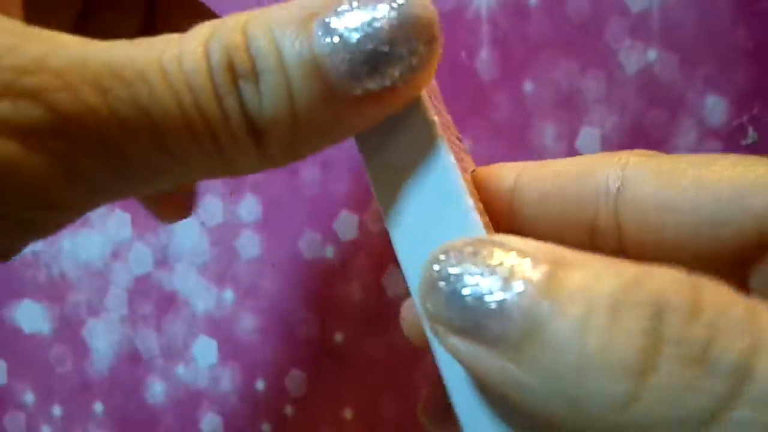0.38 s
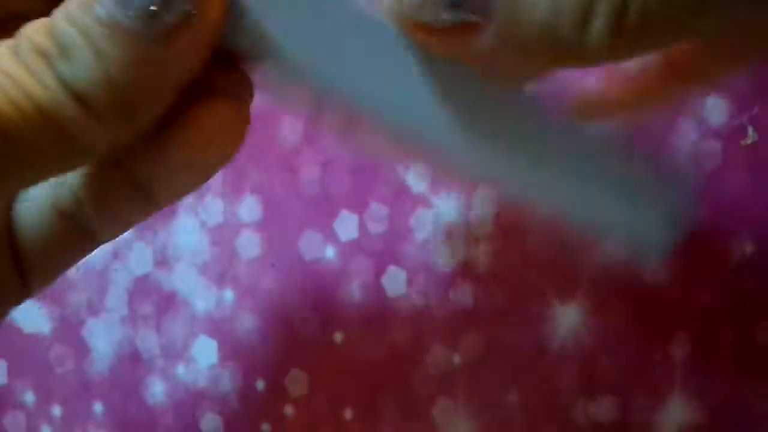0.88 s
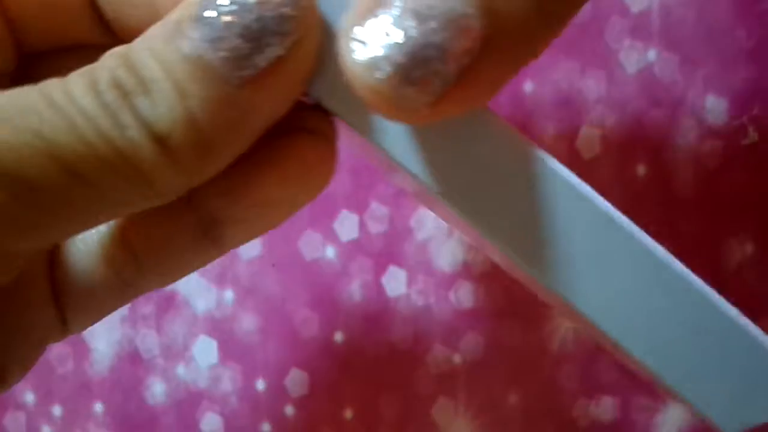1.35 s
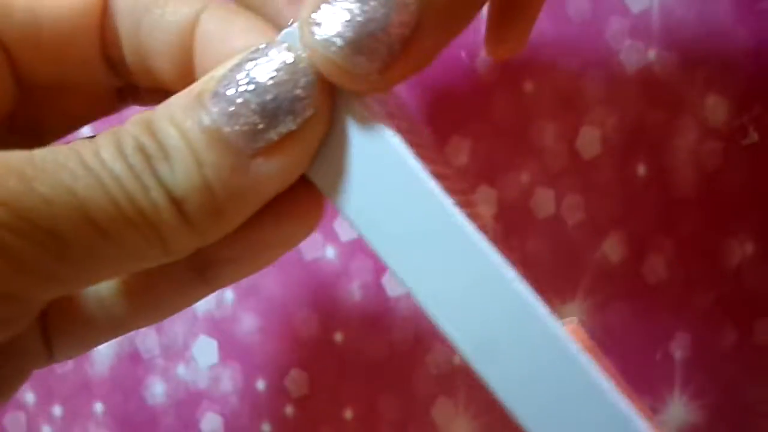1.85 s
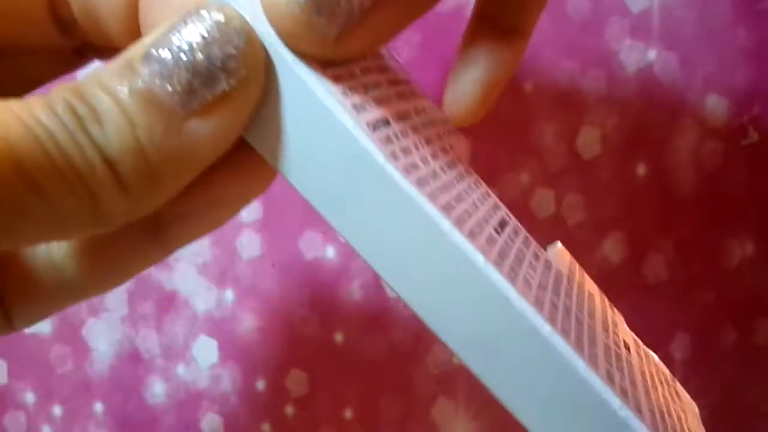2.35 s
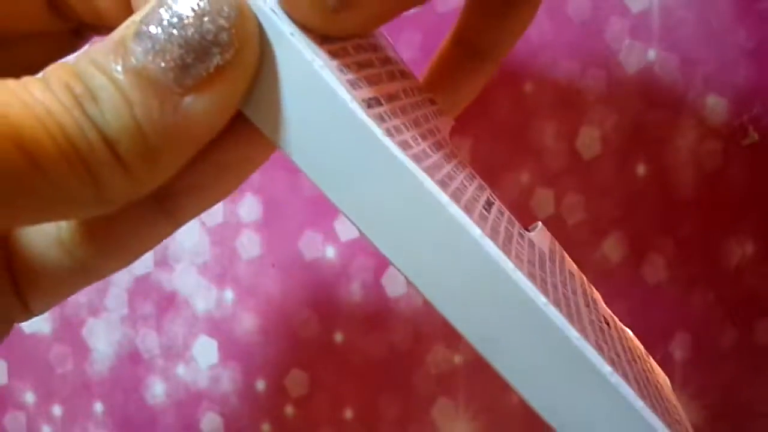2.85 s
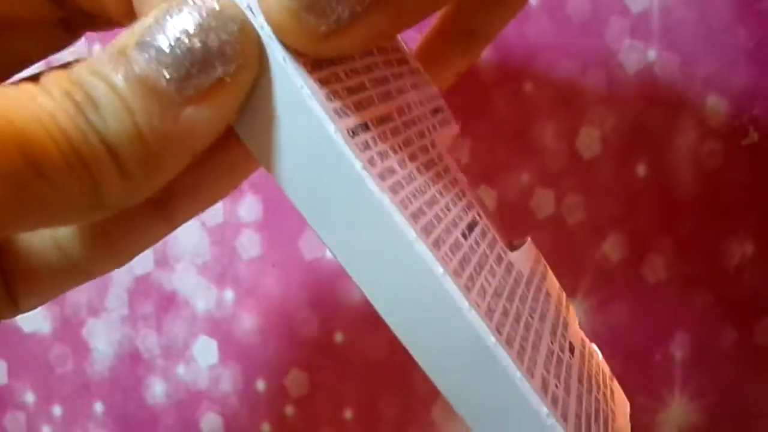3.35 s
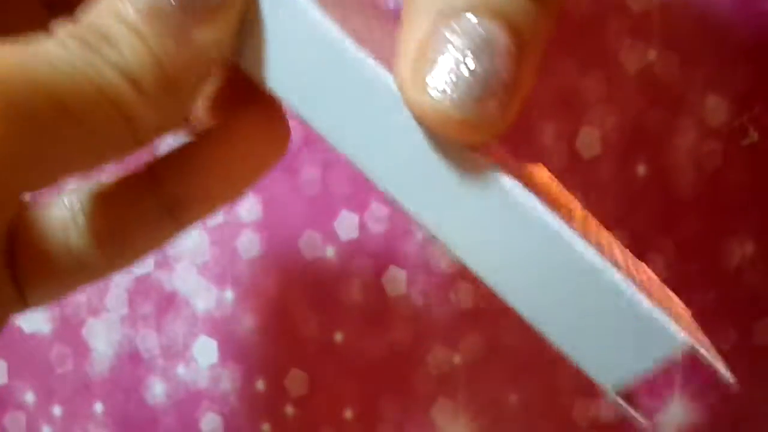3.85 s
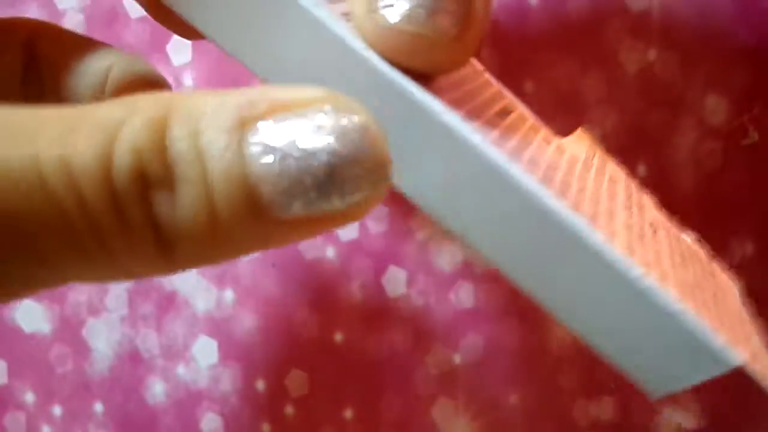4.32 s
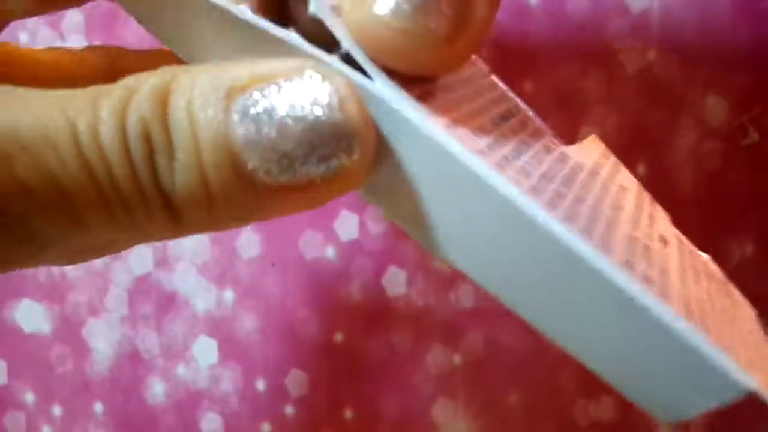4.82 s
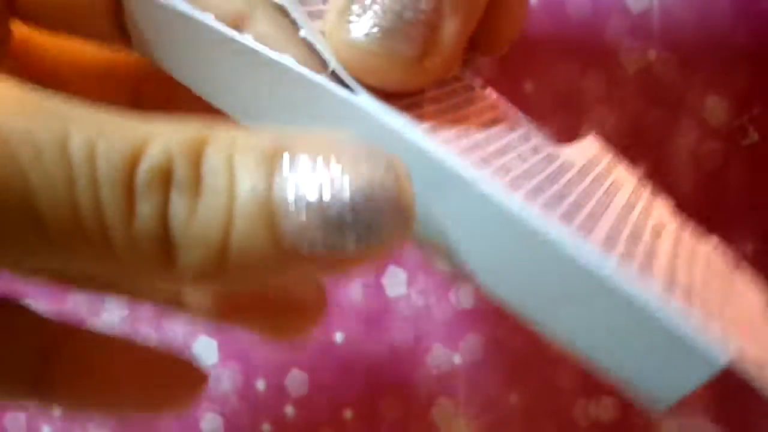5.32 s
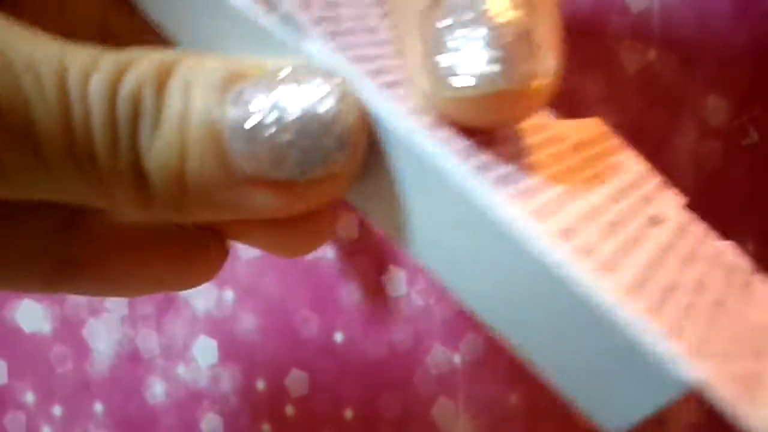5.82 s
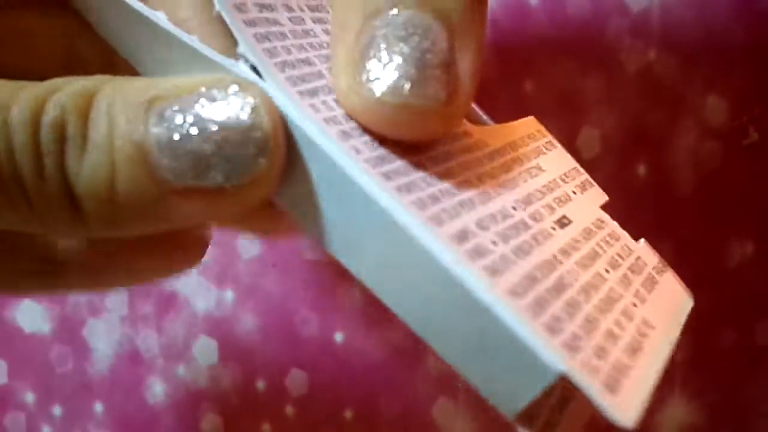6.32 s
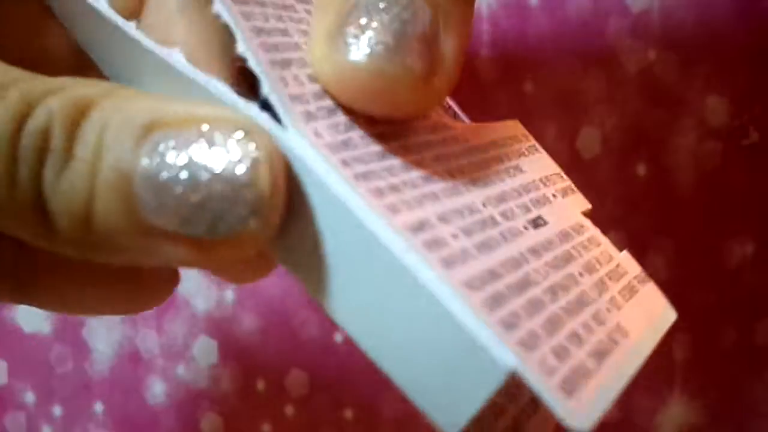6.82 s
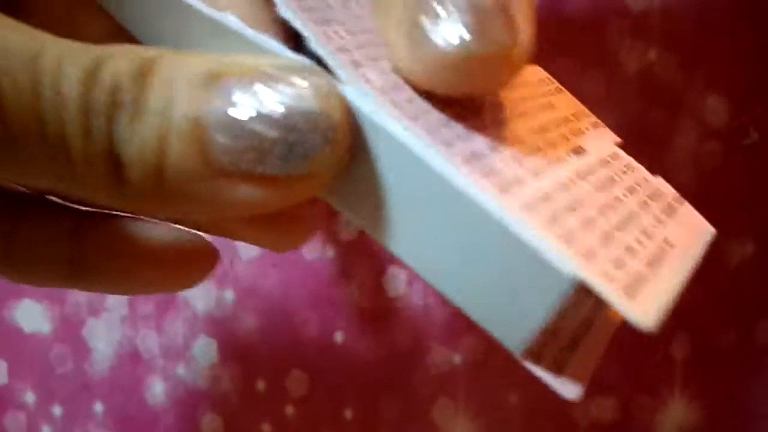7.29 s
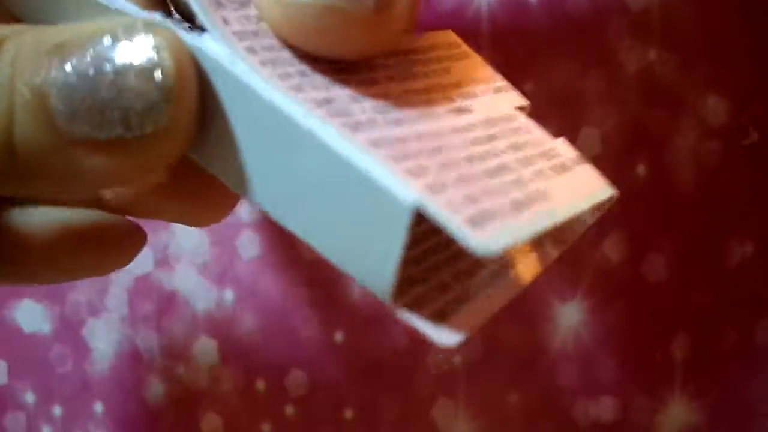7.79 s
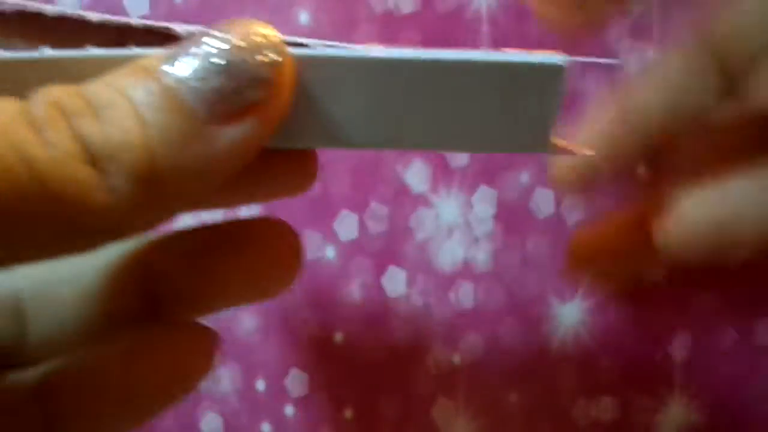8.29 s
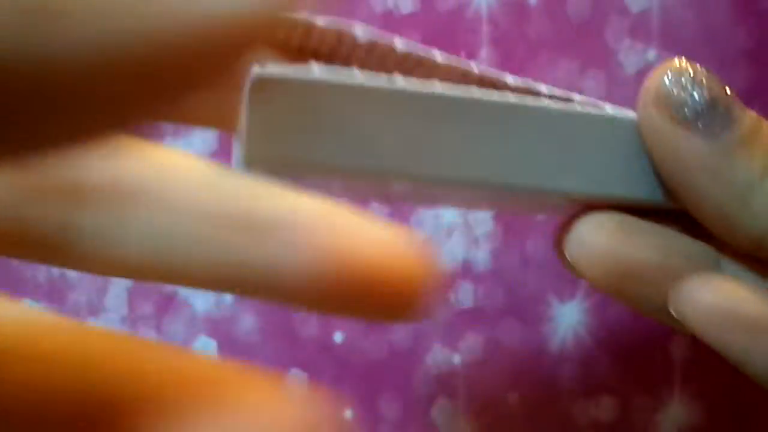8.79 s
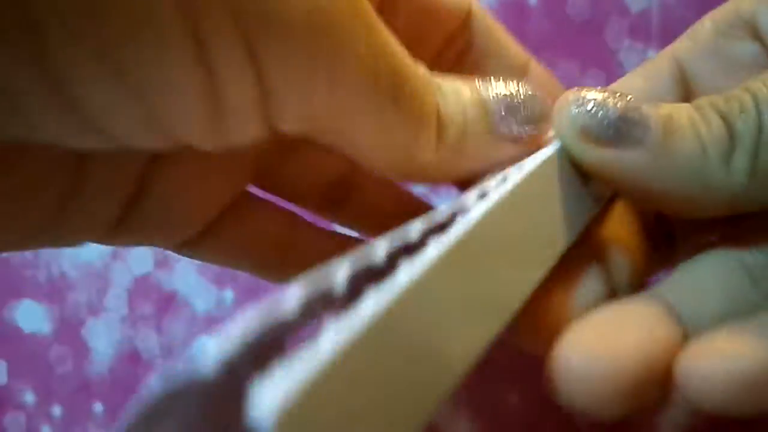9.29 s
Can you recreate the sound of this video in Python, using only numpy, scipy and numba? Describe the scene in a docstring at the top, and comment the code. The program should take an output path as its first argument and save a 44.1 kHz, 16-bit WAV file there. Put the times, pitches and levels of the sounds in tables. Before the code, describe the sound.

Fingers rub and pry open a small thin card box up close, with dry scratches, sharp cardboard snaps and crackling peeling glue in a quiet room.

```python
"""Fingers prise open a small paperboard carton close to a phone, in a quiet room.
Steady hiss, a wavering low hum and the faint rub of the holding hand (filtered noise) come first.
Then skin rubs the card in grainy noise bursts, and glue spots and creases let go in snaps: ragged
slips that excite the hollow and the walls, with a short diffuse room tail. From 3.3 s the seam also
peels in random ticks, and from 4 s fingertips bump the body, each push exciting one damped mode."""
import sys
import numpy as np
from scipy import signal
from scipy.fft import rfft, irfft, next_fast_len
from scipy.io import wavfile
from scipy.ndimage import uniform_filter1d
from numba import njit

SR = 44100
rng = np.random.default_rng(int(sys.argv[2]) if len(sys.argv) > 2 else 0)


def transcribe(u):
    """Save the signal u as a 16-bit wav file named by the first command-line argument.

    u: samples, shape (n,) or (channels, n), limited to [-1, 1]; the rate is SR.
    q: integer samples, one column per channel.
    """
    v = np.clip(np.atleast_2d(u).T, -1, 1)
    q = np.round(v * 32767).astype(np.int16)
    wavfile.write(sys.argv[1], SR, q)


def boost_factor(decibels):
    """Convert a level in decibels to a linear amplitude factor."""
    exponent = np.asarray(decibels, float) / 20
    return 10 ** exponent


N = 425565  # samples, 9.65 s


def level(x, db):
    """Level setting: scale to an rms level."""
    return x * boost_factor(db) / np.sqrt(np.mean(x ** 2))


def peak(x, db):
    """Level setting: scale to a peak level."""
    return x * boost_factor(db) / np.abs(x).max()


def curve(table):
    """Linear interpolation: the columns after the time column, one value a sample."""
    time_s, *columns = np.transpose(table)
    return [np.interp(np.arange(N) / SR, time_s, column) for column in columns]


def steps(rate_hz):
    """Random modulation: normal levels (spread 1 before smoothing) held 1 / rate_hz s, quick changes."""
    hold = int(SR / rate_hz)
    held = np.repeat(rng.standard_normal(N // hold + 1), hold)
    return uniform_filter1d(held, max(hold // 4, 1))[:N]


@njit
def svf(x, hz, width):
    """Second-order resonance: state-variable band-pass, movable centre, gain 1 at the centre."""
    y, b, l = np.empty(len(x)), 0., 0.
    for i in range(len(x)):
        g, k = np.tan(np.pi * hz[i] / SR), width / hz[i]
        v = (b + g * (x[i] - l)) / (1 + g * (g + k))
        b, l, y[i] = 2 * v - b, l + 2 * g * v, k * v
    return y


def band(x, hz, width_hz):
    """Simple resonance: one mode at a fixed or moving frequency."""
    centre_hz = np.clip(hz * np.ones(len(x)), 20., .45 * SR)
    return svf(x + 1e-18, centre_hz, float(width_hz))


def steep(x, hz, width_hz):
    """Cascaded resonance: two equal band-passes in series give steep skirts."""
    return band(band(x, hz, width_hz), hz, width_hz)


# Spectrum of the hiss, relative: frequency [Hz], density [dB per Hz]
HISS_SPECTRUM = [(15, -26), (25, 12.5), (71, -2.5), (464, -2), (868, -8.5), (1860, -11), (2520, -14),
                 (4980, -17.5), (14400, -17), (15700, -17), (17000, -37)]
# Swell of the hum: start_s [s], level_db [dB rms]
HUM_SWELL = [(0.0, -59), (0.16, -45.5), (0.56, -59.5), (1.4, -61.5), (1.8, -52.5), (2.74, -60),
             (3.98, -56.5), (4.89, -65), (5.75, -56.5), (6.07, -53.5), (6.4, -73), (7.69, -63), (8.3, -56),
             (9.65, -62)]
HISS_DB = -56
HUM_HZ, HUM_WIDTH_HZ = 58.3, 21


def background():
    """Stationary and narrow-band noise: steady coloured hiss, and a low hum that swells and wavers."""
    n = next_fast_len(N)
    hz, db = np.transpose(HISS_SPECTRUM)
    bin_hz = np.arange(n // 2 + 1) * SR / n
    colour = boost_factor(np.interp(np.log(bin_hz + 1), np.log(hz), db))
    hiss = irfft(rfft(rng.standard_normal(n)) * colour, n)[:N]
    hum = steep(rng.standard_normal(N), HUM_HZ, HUM_WIDTH_HZ)
    second_harmonic = band(rng.standard_normal(N), 2 * HUM_HZ, 25.)
    swelling_hum = boost_factor(curve(HUM_SWELL)[0]) * level(hum, 0)
    return level(hiss, HISS_DB) + swelling_hum + level(second_harmonic, -63.0)


# Modes of the card walls: pitch_hz [Hz], base_width_hz [Hz, before widening], level_db [dB, relative]
CARD_MODES = [(390, 610, -5), (730, 660, -6), (1080, 195, -5.5), (4190, 3900, 15), (6900, 3530, 16),
              (8300, 190, -8), (10000, 2900, 15.5), (11510, 840, 10.5), (14300, 2050, 21)]


def panel(x, low, bend=1):
    """Modal superposition: the walls ring at their low or high modes; bending the card shifts them."""
    ringing = 0
    for hz, width_hz, db in CARD_MODES:
        if (hz < 1500) == low:
            ringing = ringing + boost_factor(db) * steep(x, bend * hz, 1.5 * width_hz)
    return ringing


# Hollow of the box, ringing higher as its flap opens:
# start_s [s], pitch_hz [Hz], hold_db [dB, mean of the faint rub of the holding hand]
HOLLOW = [(0.0, 2880, -64), (0.51, 2490, -57), (1.3, 2420, -59.5), (2.5, 2300, -67), (2.74, 2280, -72.5),
          (3.52, 2210, -59), (3.72, 2390, -66.5), (4.06, 2460, -55), (4.45, 2320, -66.5),
          (5.13, 2350, -57.5), (5.5, 2430, -72), (5.86, 3550, -73), (6.42, 2860, -65.5), (6.93, 3145, -83),
          (7.3, 3630, -91), (8.3, 3030, -64.5), (8.57, 2920, -60), (9.65, 2920, -66)]
# How well the contact reaches the walls; it drops while only the free flap is pulled:
# start_s [s], level_db [dB, relative]
WALL_COUPLING = [(0, -8.5), (1.0, -1), (1.9, 1), (3.0, -1), (3.45, -6.5), (3.97, -2.5), (4.55, -14),
                 (4.87, -1), (5.1, -8.5), (5.45, 0), (6.05, -8), (6.4, -1.5), (6.62, -7), (6.72, -10),
                 (6.78, -20), (6.87, -26), (6.92, -3), (7.14, -1.5), (7.3, -39), (7.66, -9.5), (7.82, -1.5),
                 (8.9, -6.5), (9.65, -1)]
# Skin sliding and fibres tearing, levels at full press before the random grain changes:
# start_s [s], length_s [s], hollow_db [dB, also drives the walls], bright_db [dB]
STROKES = [(0.179, 0.027, -46, -47), (0.261, 0.057, -44.5, -43), (0.305, 0.066, -51.5, -56.5),
           (0.405, 0.11, -45.5, -46.5), (0.492, 0.074, -56.5, -57), (0.556, 0.056, -47, -46),
           (0.747, 0.1, -55, -58), (0.87, 0.037, -39.5, -42), (1.008, 0.072, -53, -48),
           (1.226, 0.049, -57, -59), (1.405, 0.34, -63.5, -55.5), (1.784, 0.076, -55, -57),
           (1.893, 0.048, -60.5, -54), (1.989, 0.048, -57, -47.5), (2.08, 0.14, -61, -57.5),
           (2.305, 0.071, -64, -64), (2.49, 0.066, -59.5, -62), (2.863, 0.026, -46.5, -50.5),
           (2.933, 0.079, -51, -54), (3.207, 0.036, -55, -70), (3.459, 0.046, -47.5, -47),
           (3.527, 0.051, -55, -49.5), (3.562, 0.12, -62, -56.5), (3.779, 0.23, -56, -51.5),
           (3.952, 0.017, -44, -41), (3.958, 0.1, -53.5, -48.5), (4.029, 0.029, -50, -47),
           (4.048, 0.023, -39, -41.5), (4.06, 0.082, -72, -54), (4.216, 0.093, -56, -59.5),
           (4.452, 0.031, -51.5, -46.5), (4.548, 0.083, -64, -44), (4.854, 0.085, -53, -50),
           (5.053, 0.012, -45.5, -66), (5.114, 0.13, -59.5, -58), (5.277, 0.022, -44, -43),
           (5.297, 0.048, -58, -53), (5.404, 0.042, -49.5, -51), (5.44, 0.056, -46.5, -46),
           (5.488, 0.08, -55.5, -46), (5.535, 0.075, -45.5, -40.5), (5.596, 0.04, -67, -58),
           (5.693, 0.045, -46.5, -48), (5.727, 0.077, -50.5, -53), (5.865, 0.065, -55, -57),
           (6.003, 0.092, -52.5, -47), (6.11, 0.071, -71, -58), (6.251, 0.04, -55, -59),
           (6.338, 0.029, -59, -49.5), (6.502, 0.084, -50.5, -46.5), (6.63, 0.12, -75, -51),
           (6.698, 0.042, -57, -33.5), (6.714, 0.052, -56, -47), (6.93, 0.021, -50, -45),
           (7.106, 0.014, -43.5, -69), (7.157, 0.1, -60, -58), (7.43, 0.028, -56, -52),
           (7.46, 0.13, -63, -60), (7.814, 0.051, -64, -49), (7.85, 0.049, -48.5, -38),
           (7.893, 0.11, -43, -39.5), (7.957, 0.028, -39.5, -40), (7.98, 0.035, -36, -36),
           (8.005, 0.05, -52, -46.5), (8.334, 0.019, -54, -57), (8.424, 0.038, -44, -51),
           (8.444, 0.16, -54, -54.5), (8.527, 0.15, -55.5, -49), (8.627, 0.29, -89, -54),
           (8.814, 0.097, -47.5, -46.5), (8.847, 0.019, -36.5, -39), (8.882, 0.005, -45, -55),
           (9.159, 0.082, -56, -50), (9.23, 0.28, -62, -52), (9.419, 0.045, -53, -47),
           (9.462, 0.15, -62.5, -51.5)]


def rub():
    """Stick-slip friction: skin catches on fibres in uneven dense grains, coloured by hollow and walls."""
    ring_hz, hold_db = curve(HOLLOW)
    press = np.zeros((3, N + SR))  # hollow, walls, fibres
    for start_s, length_s, hollow_db, bright_db in STROKES:
        i = int(start_s * SR)
        u = np.linspace(0, 1, max(int(length_s * SR), 2))
        # the finger presses in, slides and lets go
        shape = np.clip(u / 0.23, 0, 1) * np.clip((1 - u) / 0.38, 0, 1) ** 0.64
        gains = boost_factor(np.array([hollow_db, hollow_db, bright_db]))
        press[:, i:i + len(u)] += gains[:, None] * shape
    press = press[:, :N]
    press[1] *= boost_factor(curve(WALL_COUPLING)[0])
    press[0] += boost_factor(hold_db + 3.44 * steps(20.0))

    # exponential sample-by-sample peaks make the grains
    grip = boost_factor(2. * steps(120.) + 1.1 * steps(400.) + 2.6 * rng.exponential(size=N))
    air, wall, fibre = rng.standard_normal((3, N)) * grip
    bend = 1 + 0.087 * steps(25.)
    # two close modes of the hollow over a broader one
    hollow = level(steep(air, 0.961 * ring_hz, 410.0), 0)
    hollow = hollow + level(steep(air, 1.066 * ring_hz, 730.0), -1.9)
    hollow = hollow + level(steep(air, 1.234 * ring_hz, 3700.0), 0.11)
    walls, fibres = panel(wall, True, bend), panel(fibre, False, bend)
    # each part of the box is pressed a little differently from moment to moment
    return sum(p * level(layer, 0) * boost_factor(2.5 * steps(60.))
               for p, layer in zip(press, (hollow, walls, fibres)))


ROOM_DB, ROOM_T60_S, ROOM_RISE_S = -24, 0.13, 0.002


def room(x):
    """Diffuse reverberation: table and near walls return an exponentially decaying noise tail."""
    t = np.arange(SR // 4) / SR
    rise = 1 - np.exp(-t / ROOM_RISE_S)
    tail = rng.standard_normal(len(t)) * rise * np.exp(-t * np.log(1000) / ROOM_T60_S)
    response = boost_factor(ROOM_DB) * tail / np.sqrt(np.sum(tail ** 2))
    return signal.fftconvolve(x, response)[:N]


# Creases and glue spots letting go:
# start_s [s], ring_db [dB peak, hollow], crack_db [dB peak], crack_hz [Hz, centre],
# slip_s [s, time for the slip to fall 60 dB]
SNAPS = [(0.1895, -27.5, -29.5, 7940, 0.0064), (0.632, -27.5, -27.5, 8700, 0.0067),
         (0.8731, -11.5, -15.5, 11300, 0.0039), (0.8766, -7.5, -15, 8300, 0.0092),
         (0.882, -13, -12.5, 7300, 0.0047), (0.9798, -22.5, -45, 6600, 0.0096),
         (0.9887, -17.5, -23, 8000, 0.0101), (2.4195, -36, -28, 14000, 0.0056),
         (2.451, -33, -31, 12000, 0.0074), (2.7231, -50, -37, 14400, 0.004),
         (3.137, -30.5, -47, 8800, 0.0024), (3.2262, -43, -30, 13200, 0.0054),
         (3.3046, -48, -30, 13400, 0.011), (3.327, -37, -27, 13800, 0.0066),
         (3.3582, -44, -30, 13800, 0.006), (3.3719, -33, -12, 14300, 0.0039),
         (3.3762, -2, -20, 9100, 0.012), (3.3879, -17.5, -12, 11800, 0.0039),
         (3.6082, -30.5, -36, 6400, 0.0094), (3.9764, -22.5, -33, 6100, 0.0085),
         (4.1119, -19.5, -37, 6300, 0.014), (4.14, -28, -32, 7200, 0.0092),
         (4.1937, -35.5, -34, 8950, 0.01), (4.5242, -53, -30, 13800, 0.0062), (4.5422, 1.5, 4, 7970, 0.014),
         (4.698, 1, -0.5, 9500, 0.016), (4.8213, -28, -47, 10100, 0.0081), (4.8583, -26, -33, 10900, 0.014),
         (4.8755, -24.5, -37, 10000, 0.0088), (4.998, -31.5, -49, 8500, 0.014),
         (5.0996, -28.5, -60, 8700, 0.0103), (5.1716, -38, -28.5, 7460, 0.0063),
         (5.7078, -22, -24, 10000, 0.019), (5.8103, -36.5, -36, 5740, 0.0039),
         (5.8816, -34, -32, 9100, 0.0044), (5.8988, -37, -38, 8100, 0.0089),
         (5.9173, -32.5, -27.5, 7550, 0.0069), (6.0458, -37, -26, 7700, 0.0081),
         (6.1013, -44, -28.5, 7400, 0.0046), (6.1168, -43, -32, 7600, 0.0054),
         (6.1674, -44, -32, 8100, 0.004), (6.194, -31, -20, 7500, 0.0059), (6.2066, -6, -2, 7240, 0.013),
         (6.2771, -29, -23.5, 7400, 0.0085), (6.384, -25, -25.5, 6650, 0.0104),
         (6.6605, -48, -35, 11300, 0.0074), (6.6828, -44, -23, 11800, 0.0051),
         (6.7157, -15.5, -6, 11900, 0.0026), (6.7193, -6, -7.5, 9370, 0.02),
         (6.7598, -15, -11.5, 10600, 0.021), (6.7615, -7, -7.5, 13000, 0.015),
         (6.8416, -40, -38, 11400, 0.0064), (6.8607, -34.5, -38, 12500, 0.0053),
         (6.8736, -39, -46, 11600, 0.0071), (6.893, -43, -52, 10600, 0.0066),
         (6.914, -47, -56, 7800, 0.0063), (6.9283, -26, -32, 11900, 0.0089),
         (6.9454, -25.5, -36, 10800, 0.0056), (7.0282, -25.5, -31.5, 9900, 0.012),
         (7.1095, -27, -43, 6400, 0.0075), (7.129, -25, -25, 12100, 0.016), (7.1348, -26, -28, 10000, 0.01),
         (7.179, -39, -40, 8800, 0.0063), (7.3746, -50, -36, 13100, 0.0051),
         (7.3992, -40, -42, 8200, 0.004), (7.408, -32, -29, 8300, 0.0069), (7.4263, -26, -17, 10200, 0.012),
         (7.4324, -16, -13.5, 9400, 0.0048), (7.4494, -24, -22, 11200, 0.006),
         (7.4558, -25, -34, 10000, 0.011), (7.5277, -32, -34, 12100, 0.0067),
         (7.6555, -27, -18, 13100, 0.0051), (7.6708, -31, -42, 11900, 0.0081),
         (7.8224, -25, -20.5, 8800, 0.0048), (7.8738, -19.5, -26, 9500, 0.016),
         (7.9536, -8, -19.5, 6900, 0.017), (8.1318, -52.5, -33, 10600, 0.0067),
         (8.854, -25.5, -20, 5760, 0.0056), (9.0368, -30, -36, 5540, 0.0057),
         (9.1133, -35.5, -43, 5600, 0.0039), (9.1583, -32, -42, 5600, 0.0056),
         (9.1857, -32, -32, 5450, 0.007)]
CREEP_DB, CREEP_S = -21.5, .0015  # the glue stretches just before it gives; the creep dies away after
SETTLE_DB, SETTLE_T60_S = -28.5, 0.13  # loose fibres rustle on afterwards
THUD_DB = -6.5  # wall thud relative to the ring, before the wall coupling
SPREAD_DB, SPREAD_PER_DB = 8.5, 2.15  # a tearing snap spreads the ring; a clean pop keeps it narrow


def snaps():
    """Impulsive excitation: a creep, a ragged slip and a settling rustle drive the hollow and walls."""
    lead = SR // 100  # the creep begins 10 ms ahead of the slip
    out = np.zeros(N + SR)
    t = (np.arange(SR // 10) - lead) / SR
    after = np.maximum(t, 0)
    rise = 1 - np.exp(-after / 0.00024)
    creep = boost_factor(CREEP_DB) * np.exp(-np.abs(t) / CREEP_S)
    settle = boost_factor(SETTLE_DB) * np.exp(-after * np.log(1000) / SETTLE_T60_S)
    chance = rng.standard_normal((len(SNAPS), 2, len(t)))
    ring_hz, coupling_db = curve(HOLLOW)[0], curve(WALL_COUPLING)[0]
    for (start_s, ring_db, crack_db, crack_hz, slip_s), (a, b) in zip(SNAPS, chance):
        i = int(start_s * SR)
        fade = np.exp(-after * np.log(1000) / np.clip(slip_s, .0005, .04))
        ragged = a * boost_factor(2.0 * b)
        push = (rise * (fade + settle) + creep) * ragged

        spread_db = SPREAD_DB + SPREAD_PER_DB * np.clip(crack_db - ring_db, -12, 0)
        narrow = peak(band(push, 0.967 * ring_hz[i], 372.0), 0)
        ring = narrow + peak(steep(push, ring_hz[i], 3040.0), spread_db)

        # the fibres part in the first instant, at randomly shifted card modes
        crack = panel((rise * fade ** 2.38 + creep) * ragged, False, 1 + 0.12 * b[0])
        rustle = panel(rise * settle * ragged, False) / np.abs(crack).max()
        # a small crease favours card modes near its own pitch
        favoured = peak(steep(crack, crack_hz, 3070.0), 0)
        crack = favoured + peak(crack, -0.52) + boost_factor(2.0) * rustle

        # the soft walls follow more slowly than the crease itself
        thud = panel(uniform_filter1d(push, size=5), True, 1 + 0.029 * b[-1])
        thud = peak(thud, ring_db + THUD_DB + coupling_db[i])
        out[i:i + len(t)] += peak(ring, ring_db) + peak(crack, crack_db) + thud
    return out[lead:N + lead]


# The glued seam peeling fibre by fibre:
# start_s [s], end_s [s], rate [mean ticks per s], level_db [dB, base before the random tick size],
# pitch_hz [Hz, lifted flap]
PEELS = [(3.29, 3.37, 80, -65, 12800), (4.56, 4.683, 60, -39.5, 11900), (4.9, 5.346, 40, -45.5, 7700),
         (5.87, 6.2, 90, -45, 7100), (6.6, 6.761, 150, -47, 9000), (7.32, 7.597, 80, -46.5, 10600)]
FLAP_WIDTH_HZ = 2160  # of each of the two cascaded band-passes
FLAP_HISS_DB = -18  # finest fibres tearing between the ticks, relative to the base tick level


def peel():
    """Random impulse process: single fibres let go in brief uneven ticks that ring flap, card and hollow."""
    ticks, hiss, flap_hz = np.zeros(N), np.zeros(N), np.full(N, 8000.)
    when, size = rng.random(N), rng.exponential(size=N)
    for start_s, end_s, rate, db, hz in PEELS:
        span = slice(int(start_s * SR), int(end_s * SR))
        ticks[span] = (when[span] < rate / SR) * boost_factor(db + 5.5 * size[span])
        hiss[span] = boost_factor(db + FLAP_HISS_DB)
        flap_hz[span] = hz
    # each tick is noise decaying with a 0.43 ms time constant
    decay = np.exp(-1 / (0.00043 * SR))
    ticks = signal.lfilter([1], [1, -decay], ticks) * rng.standard_normal(N)
    hiss = hiss * boost_factor(4.27 * steps(40.)) * rng.standard_normal(N)
    flap = steep(ticks + hiss, flap_hz, FLAP_WIDTH_HZ)
    card = boost_factor(-16.0) * panel(ticks, False)
    hollow = band(ticks, curve(HOLLOW)[0], 1200.0)
    return flap + card + hollow


# Fingertips bumping the box body: start_s [s], level_db [dB peak], pitch_hz [Hz, thump]
KNOCKS = [(3.9762, -23, 645), (4.853, -36, 136), (4.902, -36, 140), (5.283, -36, 166), (5.486, -32.5, 245),
          (5.707, -31, 314), (6.385, -31.5, 108), (6.923, -57, 116), (7.13, -31.5, 382), (7.82, -31.5, 480),
          (7.955, -27, 90.5)]


def knocks():
    """Damped free vibration: a soft fingertip push sets the whole box thumping at one broad mode."""
    out, t = np.zeros(N + SR), np.arange(SR // 12) / SR
    push = t * np.exp(-t / 0.00018)
    for start_s, db, hz in KNOCKS:
        i = int(start_s * SR)
        out[i:i + len(t)] += peak(band(push, hz, 0.69 * hz), db)
    return out[:N]


def scene():
    """Superposition: the carton close to the microphone, its room tail, and the background."""
    carton = snaps() + knocks() + peel() + rub()
    return (carton + room(carton) + background())[None]


def roll_off(x):
    """The treble ends steeply here."""
    return signal.sosfilt(signal.butter(12, 17150, fs=SR, output="sos"), x)


def record(dry):
    """Band limiting and saturation: the phone cuts the very top and rounds the loudest snaps."""
    low_pass = signal.ellip(8, .2, 40, 15750, fs=SR, output="sos")  # order, ripple dB, stop dB, Hz
    limited = signal.sosfilt(low_pass, dry)
    mix = .88 * np.tanh(limited / .88)
    return roll_off(mix)


dry = scene()
out = record(dry)
transcribe(out)
```